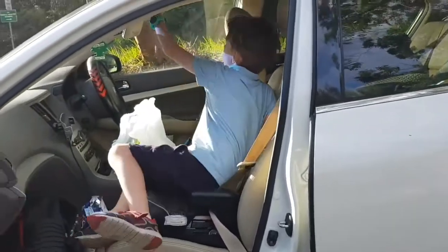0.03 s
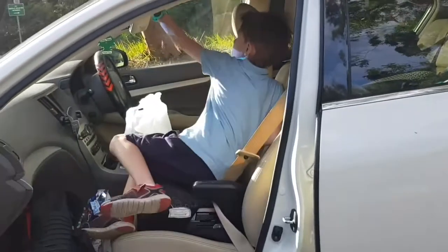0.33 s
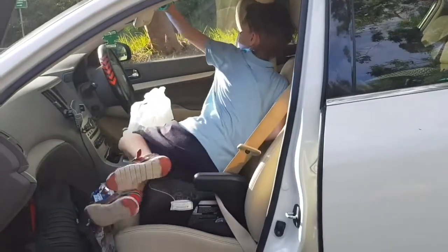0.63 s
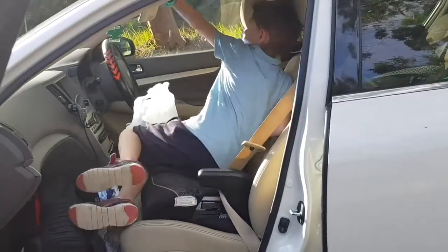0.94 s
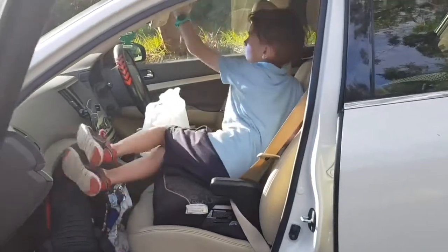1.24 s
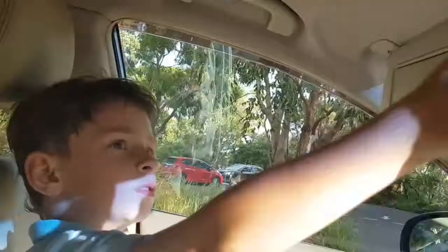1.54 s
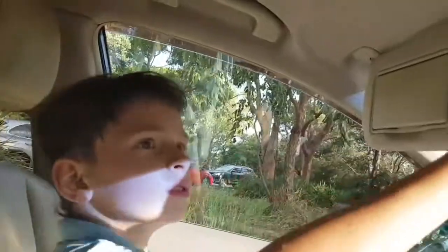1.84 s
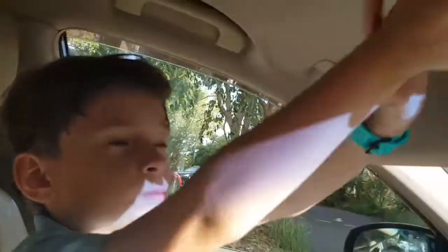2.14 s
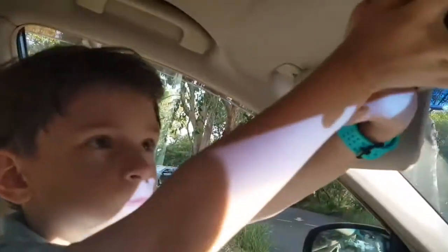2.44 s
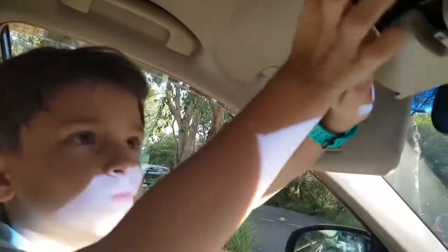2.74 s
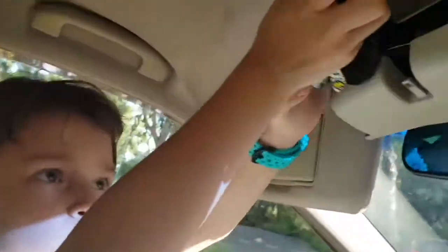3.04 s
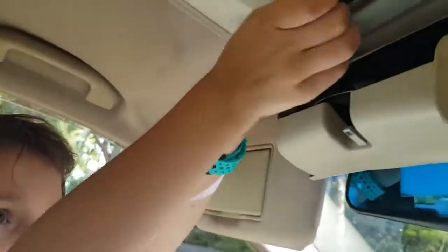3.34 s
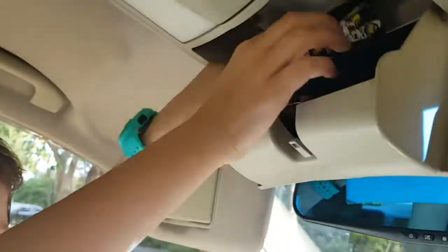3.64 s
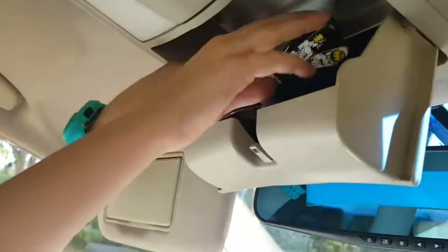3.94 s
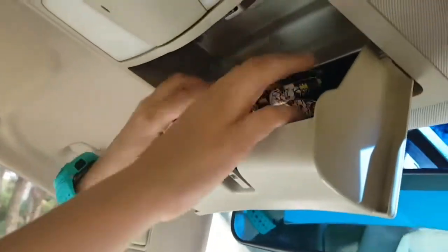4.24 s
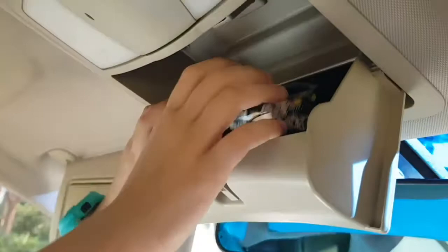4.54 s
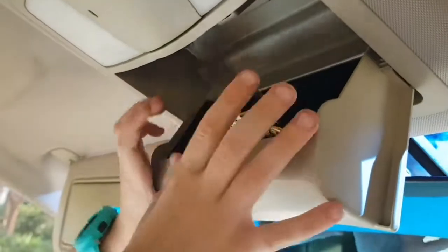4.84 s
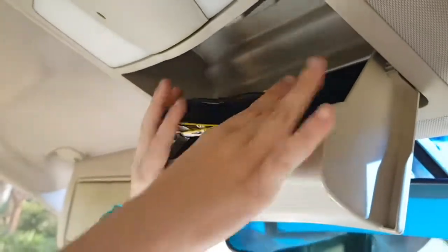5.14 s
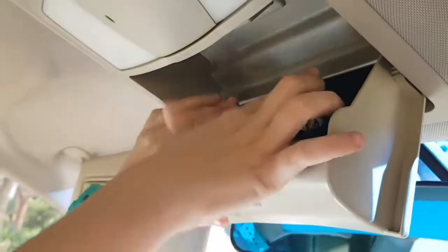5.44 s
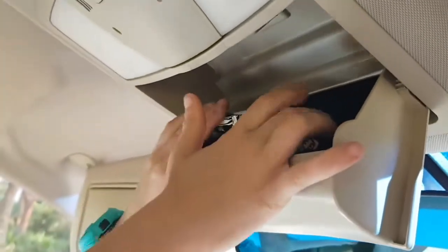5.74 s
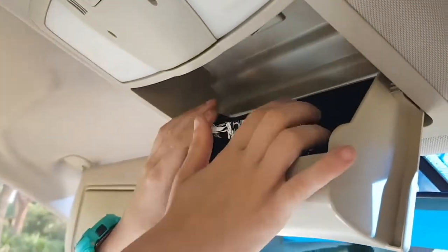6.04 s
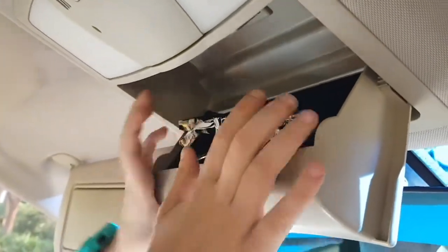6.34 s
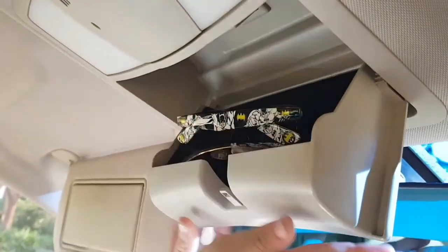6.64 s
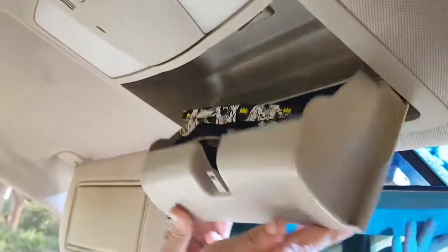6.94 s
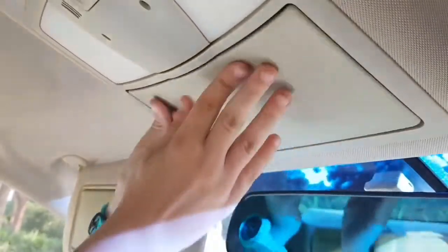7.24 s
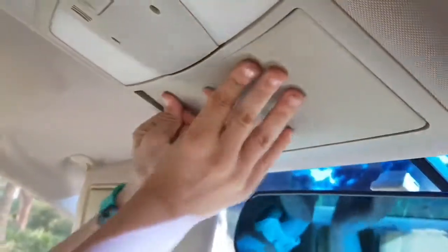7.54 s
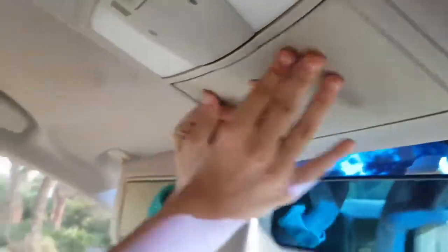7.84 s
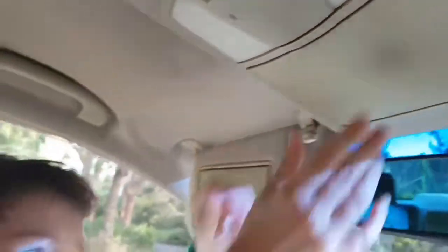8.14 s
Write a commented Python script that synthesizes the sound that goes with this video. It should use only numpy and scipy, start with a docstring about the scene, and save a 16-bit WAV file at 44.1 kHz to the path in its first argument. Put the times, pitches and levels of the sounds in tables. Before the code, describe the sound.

Dull seat bumps outdoors, then close plastic clicks, knocks and rustling inside a car, ending with a lid being shut and patted.

```python
"""A parked car, heard from a phone microphone at the open door: outdoor hush, thuds and scuffs as a child
climbs onto the front seat. After a brief silence at 1.5 s the microphone is inside the small padded cabin,
where the seat rumbles and sleeves rustle. Close by, hands unlatch the plastic compartment in the roof,
poke at the things in it, push it shut, then rub and pat the lid. Every contact rings the bin and the
cabin, brighter the harder the surfaces that meet."""
import sys
import numpy as np
from scipy import signal
from scipy.fft import rfft, irfft, next_fast_len
from scipy.io import wavfile
from scipy.ndimage import uniform_filter1d

SR = 44100
rng = np.random.default_rng(int(sys.argv[2]) if len(sys.argv) > 2 else 0)


def master(y):
    """Save y as 16-bit WAV."""
    cut = np.clip(np.atleast_2d(y).T, -1, 1)
    pcm = np.round(cut * 32767)  # scale
    wavfile.write(sys.argv[1], SR, pcm.astype(np.int16))


N = 361752
TIME = np.arange(N) / SR
RING_SAMPLES = 16384


def undb(db):
    """Decibels to gain."""
    return 10 ** (np.asarray(db) / 20)


def unit(x):
    """Scale to rms 1."""
    return x / np.sqrt(np.mean(x ** 2) + 1e-20)


def decay(t, t60):
    """A free vibration loses 60 dB in t60 seconds."""
    return np.exp(-np.log(1000) * t / t60)


def pan(db):
    """Channel gains at constant power, with the left db above the right."""
    return unit(undb(np.array([[db], [-db]]) / 2))


def colour(x, spectrum):
    """Filter x by (frequency [Hz], level [dB]) points; rms 1."""
    hz, db = np.transpose(spectrum)
    size = next_fast_len(x.shape[-1])
    bins_hz = np.maximum(np.arange(size // 2 + 1) * SR / size, 1)
    gain = undb(np.interp(np.log(bins_hz), np.log(hz), db))
    return unit(irfft(rfft(x, size) * gain, size)[..., :x.shape[-1]])


def stereo_noise(correlation, size=N):
    """White noise, partly alike at the microphone's two ports."""
    mid, side = rng.standard_normal((2, size))
    return unit(np.sqrt(1 + correlation) * mid + np.sqrt(1 - correlation) * side * np.array([[1], [-1]]))


def wander(rate_hz):
    """Slow random drift; rms 1."""
    hold = int(SR / rate_hz)
    steps = np.repeat(rng.standard_normal(N // hold + 1), hold)
    return unit(uniform_filter1d(steps, hold)[:N])


def slips(size, per_s, spread_db):
    """Tiny stick-slip impacts at random moments, a few much stronger than the rest."""
    slipping = rng.random(size) < per_s / SR
    strength = np.minimum(rng.exponential(size=size), 4)
    return slipping * rng.choice([-1, 1], size) * undb(spread_db * strength)


def add(out, start, sound):
    """Mix a sound in at start seconds."""
    i = max(int(start * SR), 0)
    out[:, i:i + sound.shape[1]] += sound[:, :N - i]


# open air beside the car: (frequency [Hz], level [dB])
OUTDOOR_SPECTRUM = [(18, -36), (30, -26), (85, -4), (202, -5), (270, 1), (332, -9.5), (479, -10),
                    (767, -16), (996, -12), (1720, -24), (4310, -22.5), (6050, -27), (11600, -26.5),
                    (15500, -31.5)]
def outdoor_air():
    """A wide, nearly steady hush around the microphone at the door."""
    return colour(stereo_noise(0.19), OUTDOOR_SPECTRUM) * undb(-42 + .5 * wander(5.2))


# the seat's rumble under load: (frequency [Hz], level [dB])
SEAT_SPECTRUM = [(20, -22), (40, -4.5), (60, 1.5), (90, 0), (130, -4), (190, -8.5), (300, -17.5),
                 (600, -31), (1500, -66)]
# the body landing on the seat: (time [s], level [dB])
BUMPS = [(0.004, -15), (.485, -39), (.8, -38)]
def seat_thuds():
    """Through the open door, the child's weight bumps dully onto the seat over a low shuffle."""
    rise_s = 0.0068
    load = undb(-45)  # the shuffle
    for start, db in BUMPS:
        age = np.maximum(TIME - start, 0)
        load = load + undb(db) * (1 - np.exp(-age / rise_s)) * decay(age, t60=0.46)
    return colour(stereo_noise(0.38), SEAT_SPECTRUM) * load * undb(2 * wander(22.8))


# a shoe on the seat cover: (frequency [Hz], level [dB])
SHOE_SPECTRUM = [(700, -24), (1500, 2), (3000, -5.5), (4700, 3.5), (6500, -9), (15000, -8.5)]
# brushes against the seat: (time [s], level [dB])
SCUFFS = [(.43, -46), (.52, -43.5), (0.803, -43), (1.345, -49), (1.374, -39.5), (1.44, -49)]
def scuffs():
    """Just inside the door, shoes and clothes brush the seat in short swells of hiss."""
    swells = sum(undb(db) * np.exp(-((TIME - centre) / 0.011) ** 2) for centre, db in SCUFFS)
    return swells * colour(stereo_noise(0.087), SHOE_SPECTRUM)


# room tone inside the car: (frequency [Hz], level [dB])
CABIN_SPECTRUM = [(25, -15), (55, -4), (125, 0.5), (220, -18), (750, -19), (1200, -33.5), (3000, -39),
                  (6300, -34.5), (8500, -50), (12000, -30), (16000, -34)]
def cabin_air():
    """The faint hum and hiss of the still cabin, all around the microphone."""
    return colour(stereo_noise(.45), CABIN_SPECTRUM) * undb(-60.5)


# modes of the overhead bin and its lid: (frequency [Hz], level [dB])
BIN_MODES = [(125, -10), (260, -11), (380, -7), (429, -1), (660, 0), (803, 1), (1025, -9), (1179, -2),
             (1354, -5), (1585, -8), (1912, -10), (2310, -9), (3015, -13), (3190, -13), (4400, -9),
             (5500, -12)]
def bin_ring(spread_db, detune):
    """Each place of contact excites the bin's modes differently; each microphone port hears its own mix."""
    hz, db = np.transpose(BIN_MODES)
    t = np.arange(RING_SAMPLES // 2) / SR
    t60 = 0.066 / np.sqrt(hz / 1000)  # lower modes ring longer
    strength, shift, lag = rng.standard_normal((3, len(hz)))
    waves = np.exp(np.outer(2j * np.pi * hz * (1 + detune * shift) - np.log(1000) / t60, t))
    port_phase = np.exp(1j * np.outer([1, -1], lag * np.clip(hz / 2300, .3, 1.2)))
    ring = ((undb(db + spread_db * strength) * port_phase) @ waves).imag
    return np.pad(ring, ((0, 0), (0, RING_SAMPLES - len(t))))


# how much the child moves: (time [s], weight on the seat [dB], hands and arms [dB])
MOVEMENT = [(1.52, -41, -51), (2.1, -52.5, -50.5), (2.4, -48, -51.5), (2.68, -46.5, -46.5), (3.1, -76, -67),
            (3.3, -50.5, -60.5), (3.7, -46, -63), (4.3, -60, -74.5), (4.9, -50.5, -51), (5.17, -51, -67.5),
            (5.56, -56.5, -62), (5.93, -54, -78), (6.42, -49.5, -61), (6.68, -56, -64.5),
            (6.85, -43.5, -56.5), (7.48, -38, -48), (7.7, -49, -57), (8.2, -49, -55)]
# skin on plastic: (frequency [Hz], level [dB])
SKIN_SPECTRUM = [(120, -24), (280, -4.5), (420, 3.5), (540, -8), (720, 5), (950, -8.5), (1200, -3.5),
                 (1600, -9), (3000, -27)]
# sleeve cloth: (frequency [Hz], level [dB])
SLEEVE_SPECTRUM = [(700, -31), (1600, -3.5), (2400, -2), (3500, -4.5), (5800, -1.5), (8500, -13),
                   (15000, -11)]
def fidgeting():
    """Near the microphone, shifting weight rumbles the seat, fingers creep over the bin, sleeves rustle."""
    times, weight_db, arms_db = np.transpose(MOVEMENT)
    weight_db = np.interp(TIME, times, weight_db)
    arms_db = np.interp(TIME, times, arms_db)
    seat = colour(stereo_noise(0.96), SEAT_SPECTRUM) * undb(weight_db - 2.8 + 5.2 * wander(22))
    ring = bin_ring(spread_db=1.5, detune=.003)
    creep = signal.fftconvolve(ring, slips(N, per_s=400, spread_db=3)[None], axes=1)[:, :N]
    skin = colour(stereo_noise(0.77), SKIN_SPECTRUM)
    fingers = unit(skin + 1.3 * unit(creep)) * undb(arms_db - 4.5 + 4.4 * wander(25))
    cloth = stereo_noise(.1) * (.7 * np.abs(slips(N, per_s=900, spread_db=6)) - 7)  # hiss with tiny dips
    sleeves = colour(cloth, SLEEVE_SPECTRUM) * undb(arms_db - 3 + 0.63 * wander(21))
    return seat + fingers + sleeves


# the five registers thump, panel, shell, click, tick; every balance_db follows this order:
# (low edge [Hz], high edge [Hz], cabin t60 [s], left-right correlation [0-1], left minus right [dB])
REGISTERS = [(69, 217.5, .27, 0.98, 1.5), (291.4, 503, 0.2, 0.88, 3.5), (576, 1610, .095, 0.2, -0.5),
             (1580, 5900, 0.11, 0, 0), (6280, 15000, 0.11, 0, -2.5)]
# colour of the ring of trim and cabin: (frequency [Hz], level [dB])
TRIM_SPECTRUM = [(40, 1), (85, 3.5), (135, 7), (220, -2.5), (430, 2.5), (520, -4.5), (650, 6), (1500, -1.5),
                 (2500, 1.5), (3600, -3.5), (5500, -5), (8000, -23), (15000, -21)]
def cabin_ring():
    """The cabin per register: strong first reflections, most in the treble, then a tail of lingering lows."""
    t = np.arange(RING_SAMPLES) / SR
    rings = []
    for low_hz, _, t60, correlation, _ in REGISTERS:
        early = 1 + (0.8 + low_hz / 7000) * np.exp(-t / 0.0046)
        reflections = colour(stereo_noise(correlation, RING_SAMPLES), TRIM_SPECTRUM)
        rings.append(reflections * early * decay(t, t60))
    return rings


def contact(force, levels_db, span_s, modes_db):
    """A force rings bin and cabin; each register has its level over the first span_s seconds."""
    modes = undb(modes_db) * bin_ring(spread_db=2.2, detune=.005)
    out = 0
    for (low_hz, high_hz, _, _, side_db), cabin, db in zip(REGISTERS, cabin_ring(), levels_db):
        band = signal.butter(3, [low_hz, high_hz], "band", fs=SR, output="sos")
        sound = signal.sosfilt(band, signal.fftconvolve(cabin + modes, force[None], axes=1))
        rms = np.sqrt(np.mean(sound[:, :int(span_s * SR)] ** 2))
        out = out + sound / rms * undb(db) * pan(side_db)
    return out


def brighten(db):
    """Harder surfaces tilt the registers about the shell, by db per register; the thump stays."""
    return db * np.array([0, -1, 0, 1, 2])


def strike(start, length, levels_db):
    """Surfaces graze, meet in one impact, and loose plastic chatters in contact; gives (start, sound)."""
    lead, size = int(0.0082 * SR), int(length * SR)
    blow = 0.19 * slips(size, per_s=1700, spread_db=2.5) * np.linspace(1, .5, size)
    blow[0] = 0.97  # the impact, ahead of the chatter
    graze = .05 * slips(lead, per_s=3500, spread_db=2.5) * np.linspace(0, 1, lead)
    sound = contact(np.concatenate([graze, blow]), levels_db, span_s=0.024 + lead / SR, modes_db=-7)
    return start - lead / SR, pan(-2.8 + rng.standard_normal()) * sound


# light contacts in the bin: (time [s], contact time [s], level [dB], brightness [dB per register])
CLICKS = [(1.533, 0.019, -43.5, 0.5), (1.864, 0.015, -46.5, -4), (1.953, .004, -46, 4),
          (2.063, .0024, -24.5, 3), (2.136, 0.015, -28.5, 5.5), (2.166, 0.0046, -34, 7.5),
          (2.213, 0.0089, -31, -2), (2.411, 0.0057, -54, 7), (2.462, 0.003, -64, 12.5),
          (2.85, 0.0048, -33.5, -9.5), (3.218, .004, -69.5, 8.5), (3.365, 0.0026, -47, -14.5),
          (3.774, 0.0076, -50.5, 4.5), (3.816, 0.0063, -58, 4.5), (3.876, .008, -52.5, -6.5),
          (4.153, 0.0091, -64.5, -1), (4.684, 0.015, -46, -6.5), (4.75, 0.01, -51.5, -6),
          (4.809, .017, -33.5, -7.5), (4.916, 0.014, -46.5, 2), (5.195, 0.0071, -61, -10),
          (5.366, 0.0037, -49, -5), (5.586, .0016, -36, -6), (5.813, 0.028, -49, -5.5),
          (6.224, .011, -57, -12), (6.382, 0.0015, -38, -5), (6.427, 0.0025, -48.5, 7),
          (6.56, 0.014, -60.5, 11), (6.662, 0.0041, -64, 9.5)]
def clicks():
    """Overhead and a little to the right, the latch and loose things click against the bin."""
    out = np.zeros((2, N))
    balance_db = np.array([-9, -11, -2.5, -1, -4])
    for start, length, db, bright_db in CLICKS:
        add(out, *strike(start, length, db + balance_db + brighten(bright_db)))
    return out


# catches and small hard parts with a note of their own: (time [s], pitch [Hz], t60 [s], peak [dB])
SNAPS = [(1.535, 2270, 0.1, -30.5), (1.654, 2380, 0.2, -40), (1.70, 2330, 0.062, -33),
         (2.968, 1110, 0.069, -29), (3.055, 3110, 0.066, -36), (3.2541, 752, 0.058, -15.5),
         (3.2552, 3640, 0.029, -16.5), (3.254, 4690, 0.048, -16), (3.445, 792, .07, -7),
         (3.445, 438, 0.15, -17), (4.011, 3270, 0.065, -25), (4.686, 2096, 0.081, -37),
         (5.621, 1020, 0.03, -11), (6.916, 5250, 0.016, -20)]
def snaps():
    """Each part rings as a close pair of modes, started by a blow and roughened by a short rattle."""
    out, t = np.zeros((2, N)), np.arange(RING_SAMPLES // 2) / SR
    for start, hz, t60, db in SNAPS:
        lag = rng.standard_normal((2, 2, 1)) * min(hz / 4000, 1.2)
        phase = 2 * np.pi * hz * t
        tone = np.sin(phase + lag[0]) + .55 * np.sin(1.07 * phase + lag[1])
        size = int(t60 / 5 * SR) + 2
        force = .16 * slips(size, per_s=900, spread_db=3) * np.linspace(1, .3, size)
        force[0] = 1
        ring = signal.fftconvolve(tone * decay(t, t60), force[None], axes=1)
        add(out, start, pan(-2.9) * undb(db) * ring / np.abs(ring).max())
    return out


# hand or lid against the bin:
# (time [s], contact time [s], level [dB], brightness [dB per register], hollow shell ring [dB])
KNOCKS = [(1.651, 0.0034, -42, 2.5, -22), (1.697, .02, -41, -4, 1.5), (1.896, 0.022, -45, 3, 0),
          (1.971, 0.018, -30.5, -2.5, 6.5), (2.052, 0.002, -21, -2, 2), (2.098, 0.0024, -37.5, 6.5, 12.5),
          (2.814, 0.0039, -37.5, -0.5, 2.5), (2.965, 0.01, -39, -0.8, 4.5), (3.254, 0.0064, -34.5, 2, 0.5),
          (3.4441, .0045, -22.5, -4, 6.5), (3.603, 0.0073, -46.5, -7.5, 2.5), (3.749, .003, -38.5, 1, 0),
          (4.011, 0.0068, -34.5, -0.5, 1.5), (4.568, 0.012, -39, 3.5, -5.5),
          (5.308, 0.0091, -38.5, 0.5, -2.5), (5.621, .0012, -33, -2, 12), (6.394, 0.0029, -41.5, 5, -19),
          (6.814, 0.0055, -43, -3, -1), (6.915, 0.0034, -49, 3, -8), (7.027, 0.012, -34, -1, -4.5),
          (7.19, 0.0058, -20, -1.6, -2), (7.312, 0.0059, -47.5, 0.5, -5), (8.017, 0.022, -51, 3.5, -1.5),
          (8.108, 0.0039, -43, -4, 1)]
def knocks():
    """Knocks ring the bin above the microphone; the soft roof lining thumps much alike under each."""
    out = np.zeros((2, N))
    middling_db, thump_growth = -37.5, 0.41
    for start, length, db, bright_db, hollow_db in KNOCKS:
        thump_db = middling_db + thump_growth * (db - middling_db)
        upper_db = db + np.array([-6, -1 + hollow_db, -0.5, -4.5])  # panel, shell, click, tick
        add(out, *strike(start, length, np.append(thump_db, upper_db) + brighten(bright_db)))
    return out


def slide(length, levels_db):
    """Sliding is a swell of small slips over smooth friction, in bursts as the grip catches and lets go."""
    size = int(length * SR)
    grip = np.interp(np.arange(size) / SR, np.arange(60) * .005, rng.standard_normal(60))
    friction = slips(size, per_s=1100, spread_db=3.5) + 0.16 * rng.standard_normal(size)
    force = friction * undb(2.9 * grip) * signal.windows.tukey(size, .45)
    return pan(-1.3) * contact(force, levels_db, span_s=size / SR + 0.0017, modes_db=-7.5)


# plastic sliding on plastic: (time [s], length [s], level [dB], brightness [dB per register])
SCRAPES = [(1.73, 0.024, -46.5, -2), (1.987, 0.037, -24.5, -6), (2.055, 0.028, -14.5, -4),
           (2.143, 0.045, -24.5, 4), (2.68, 0.1, -39, -4.5), (3.041, .043, -42.5, 2),
           (4.311, 0.082, -65, -11.5), (4.586, 0.039, -40.5, 3), (4.834, 0.031, -38, 2.5),
           (4.914, 0.065, -36.5, 4.5), (5.604, 0.014, -33.5, 3), (6.95, 0.093, -57, -15),
           (7.46, 0.14, -38.5, -8)]
def scrapes():
    """Up at the bin, hard plastic scrapes thinly, with little bass."""
    out = np.zeros((2, N))
    balance_db = np.array([-15.5, -15, -3, -2, -10])
    for start, length, db, bright_db in SCRAPES:
        add(out, start, slide(length, db + balance_db + brighten(bright_db)))
    return out


# hand strokes over bin and lid: (time [s], length [s], level [dB], brightness [dB per register])
RUBS = [(2.082, 0.057, -29, 3.5), (2.17, .12, -40, 4), (2.256, .13, -52, 7), (2.82, 0.15, -49.5, -3.5),
        (5.046, 0.089, -55, -1), (6.255, 0.078, -60.5, -4), (6.493, 0.071, -53.5, -1),
        (6.929, 0.08, -54.5, -3), (7.039, 0.054, -45.5, 4), (7.1, 0.062, -46, -0.5),
        (7.433, 0.1, -34.5, -3), (7.553, .11, -43.5, 0.5), (7.821, 0.057, -40.5, -3.5)]
def rubs():
    """A hand rubs the plastic close by, with more body than a scrape."""
    out = np.zeros((2, N))
    balance_db = np.array([1, 0.5, -1.35, -6.5, -8])
    for start, length, db, bright_db in RUBS:
        add(out, start, slide(length, db + balance_db + brighten(bright_db)))
    return out


# modes of the roof panel and the air under it: (frequency [Hz], level [dB], t60 [s])
ROOF_MODES = [(52.7, -2, 0.32), (93.1, -10, 0.27), (126.5, -2, .2)]
# pushes that flex the roof: (time [s], level [dB])
PUSHES = [(2.159, -34), (3.25, -41), (3.749, -36), (4.587, -34), (4.975, -40), (5.321, -32), (6.391, -26.5),
          (6.82, -25.5), (7.849, -28), (8.115, -26.5)]
def roof_booms():
    """A soft push swings the roof panel and the air around the microphone for a few cycles."""
    out, t = np.zeros((2, N)), np.arange(RING_SAMPLES) / SR
    for start, db in PUSHES:
        for hz, mode_db, t60 in ROOF_MODES:
            swing = (1 - np.exp(-t / 0.0086)) * decay(t, t60)
            lag = .5 * rng.standard_normal((2, 1))
            detune = 1 + 0.055 * rng.standard_normal()  # each push bends the panel in a different place
            tone = np.sin(2 * np.pi * hz * detune * t + lag)
            add(out, start, undb(db + mode_db) * swing / swing.max() * tone)
    return out


# pats on the shut lid: (time [s], level [dB])
PATS = [(7.273, -38), (7.404, -35.5), (7.552, -31.5), (7.859, -34), (7.992, -42.5)]
def pats():
    """Overhead, a flat hand lands soft and low on the lid."""
    out = np.zeros((2, N))
    contact_s, balance_db = .007, np.array([2, -0.5, -11.5, -16, -24])
    for start, db in PATS:
        add(out, *strike(start, contact_s, db + balance_db))
    return out


def scene():
    """The microphone is at the open door first and, after a brief silence, inside the cabin."""
    door_until_s, cabin_from_s = 1.49, 1.518
    hands = knocks() + clicks() + pats() + snaps() + scrapes() + rubs() + roof_booms()
    at_door = pan(-0.4) * (outdoor_air() + seat_thuds() + scuffs())
    in_cabin = pan(-1.2) * (fidgeting() + cabin_air())
    return at_door * (TIME < door_until_s) + in_cabin * (TIME > cabin_from_s) + hands


def record(dry):
    """The phone rounds the highest peaks and cuts the top of the treble."""
    ceiling, top_hz = .9, 15950
    rounded = ceiling * np.tanh(dry / ceiling)
    return signal.sosfilt(signal.ellip(10, .2, 80, top_hz, fs=SR, output="sos"), rounded)


dry = scene()
out = record(dry)
master(out)
```